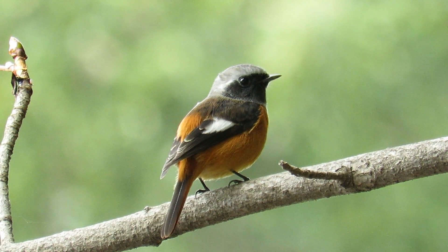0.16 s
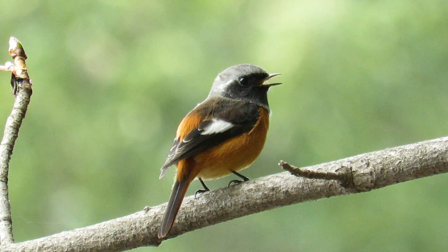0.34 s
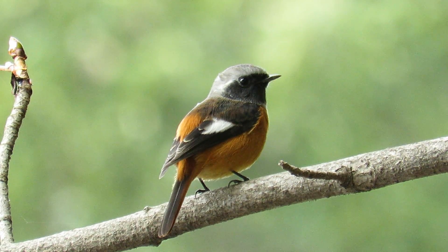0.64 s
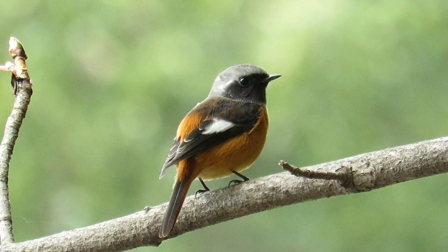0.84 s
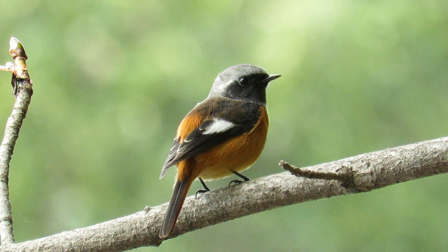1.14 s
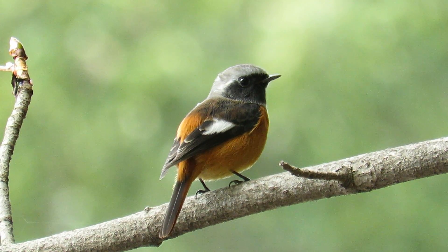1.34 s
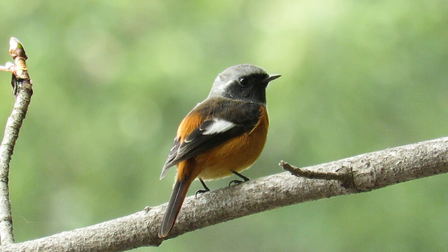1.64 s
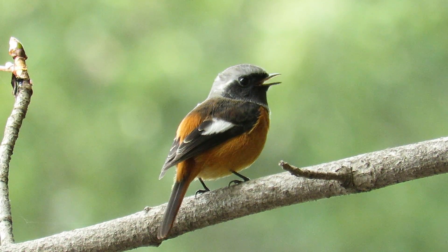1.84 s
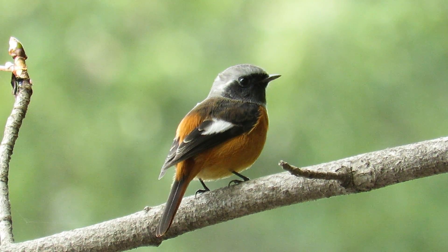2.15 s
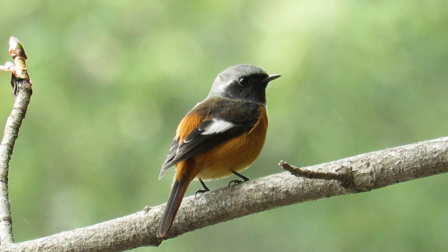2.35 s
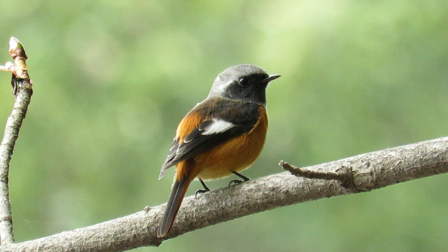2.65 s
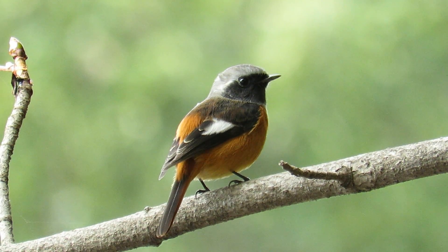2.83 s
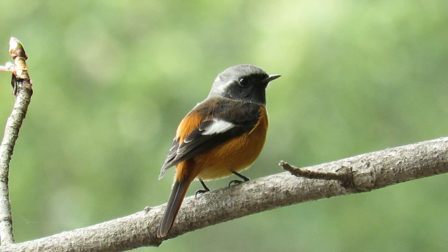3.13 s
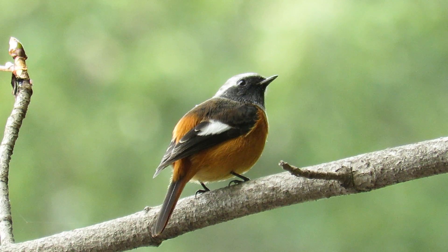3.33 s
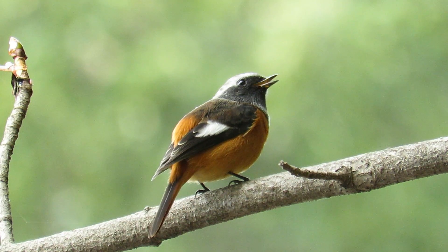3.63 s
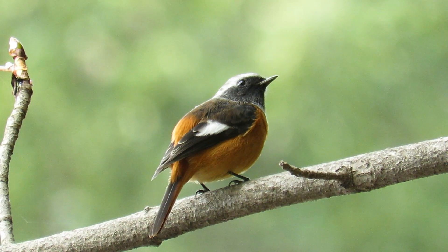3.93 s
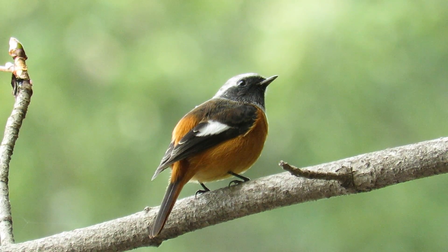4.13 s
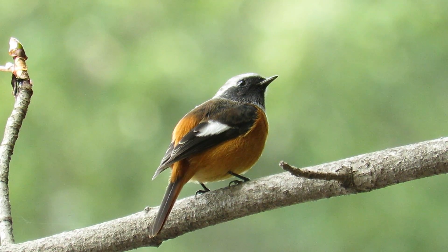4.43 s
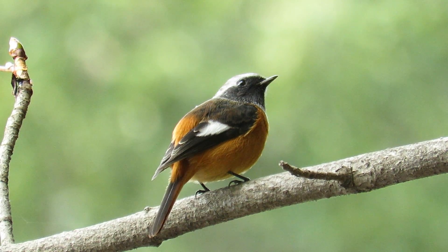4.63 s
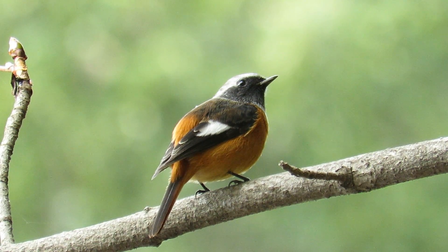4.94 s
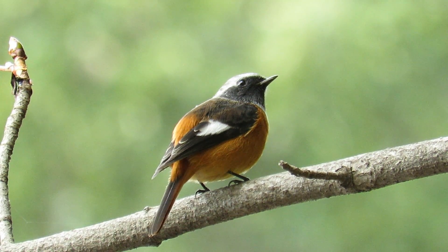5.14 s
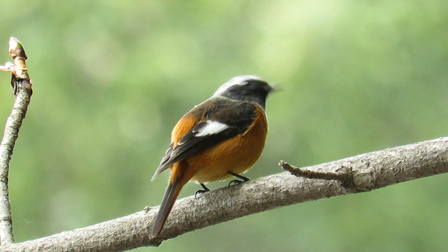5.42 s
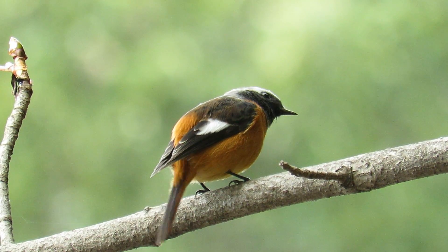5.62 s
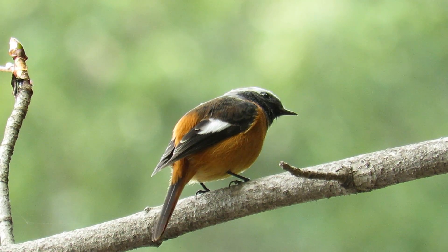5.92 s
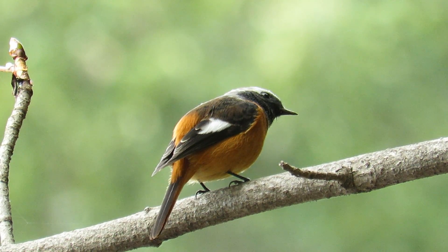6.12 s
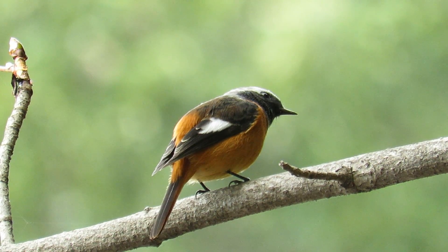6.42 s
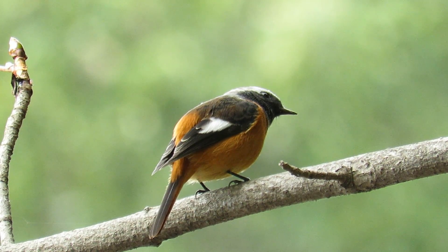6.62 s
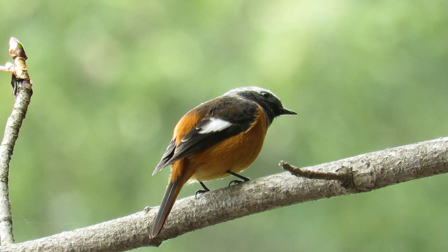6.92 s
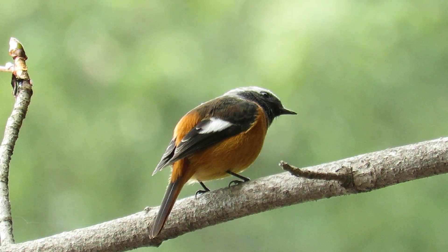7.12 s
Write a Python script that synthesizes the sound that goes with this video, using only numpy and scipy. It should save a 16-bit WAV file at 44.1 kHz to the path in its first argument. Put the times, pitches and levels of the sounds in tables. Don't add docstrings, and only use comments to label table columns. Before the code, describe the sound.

A small bird gives four thin, high single-note whistles spaced well apart, over soft hiss, faint cricket trills and distant chirps outdoors.

```python
import sys
import numpy as np
from scipy import signal
from scipy.fft import rfft, irfft, next_fast_len
from scipy.io import wavfile
from scipy.ndimage import uniform_filter1d, map_coordinates

SR = 44100
rng = np.random.default_rng(int(sys.argv[2]) if len(sys.argv) > 2 else 0)


def bounce(signal):
    frames = np.transpose(np.atleast_2d(signal))
    limited = np.clip(frames, -1, 1)
    pcm = np.round(limited * 32767).astype(np.int16)
    wavfile.write(sys.argv[1], SR, pcm)


def gain_from_db(level_db):
    decades = np.asarray(level_db, float) / 20
    return 10 ** decades


N = 320607
TIME = np.arange(N) / SR


def unit(x):
    return x / np.sqrt(np.mean(x ** 2) + 1e-20)


def wobble(rate_hz):
    knots = rng.standard_normal(int(N * rate_hz / SR) + 4)
    return map_coordinates(knots, [TIME * rate_hz])


def filtered(x, response):
    m = next_fast_len(N + SR // 2)
    return irfft(rfft(x, m) * response(np.fft.rfftfreq(m, 1 / SR)), m)[..., :N]


def coloured(spectrum):
    f, db = np.transpose(spectrum)
    shape = lambda hz: gain_from_db(np.interp(np.log(hz + 1), np.log(f + 1), db))
    return unit(filtered(rng.standard_normal(N), shape))


def window(start_s, length_s, edge_s):
    inside = np.minimum(TIME - start_s, start_s + length_s - TIME) / edge_s
    return np.sin(np.pi / 2 * np.clip(inside, 0, 1)) ** 2


def tone_of(hz):
    return np.sin(2 * np.pi * np.cumsum(hz) / SR)


def ports(x, pan_db, lead_rad):
    sign = np.array([[.5], [-.5]])
    return filtered(x, lambda hz: gain_from_db(pan_db * sign) * np.exp(1j * lead_rad * sign))


def foliage(x, t60_s, gap_s):
    t = np.arange(SR * 2 // 3) / SR
    own, shared = rng.standard_normal((2, len(t))), rng.standard_normal(len(t))
    tail = (own + 1.2 * shared) * gain_from_db(-60 * t / t60_s) * (1 - np.exp(-(t / gap_s) ** 2))
    return signal.oaconvolve(x[None], tail / np.linalg.norm(tail[0]), axes=1)[:, :N]


def distant(x, pan_db, lead_rad, wet_db, t60_s):
    return ports(x, pan_db, lead_rad) + gain_from_db(wet_db) * foliage(x, t60_s, gap_s=0.0018)


def floor():
    # (frequency [Hz], density [dB per Hz])
    shared_spectrum = [(12, -46), (20, -17), (65, -6.5), (95, -5), (190, -8), (249, -0.5), (300, -6),
                       (419, -8), (620, -10.5), (1000, -11.5), (1650, -15.5), (5000, -17.5), (13000, -21),
                       (16000, -22)]
    # (frequency [Hz], density [dB per Hz])
    opposed_spectrum = [(12, -63.5), (20, -35), (59, -26.5), (119, -7.5), (187, -11.5), (215, -3.5),
                        (254, 2), (308, -7.5), (355, -5), (554, -9), (1050, -15), (1560, -20), (3310, -25),
                        (16000, -30)]
    mid = gain_from_db(-50.5 + .4 * wobble(2)) * coloured(shared_spectrum)
    side = gain_from_db(-44.5 + .4 * wobble(2)) * coloured(opposed_spectrum)
    return np.array([mid + side, mid - side])


def chirps():
    # (time [s], length [s], start pitch [Hz], end pitch [Hz], level [dB])
    chirp_notes = [(0., .02, 2874, 2620, -54.5), (0.058, .04, 2320, 2180, -55),
                   (0.297, .05, 2300, 3300, -54.5), (0.382, .055, 2490, 2173, -56),
                   (0.626, .07, 1740, 1930, -61.5), (3.243, 0.0338, 2927, 2696, -61),
                   (3.323, 0.1, 2635, 2168, -58.5), (3.395, 0.08274, 2215, 1384, -62.5),
                   (4.231, 0.0284, 2950, 2766, -58), (4.303, 0.03803, 2200, 2450, -59.5),
                   (4.383, .03, 2422, 2305, -61.5), (4.952, 0.0396, 2400, 2300, -60),
                   (5.505, 0.05193, 1760, 1810, -62), (0.816, 0.1221, 285, 296, -53)]
    voice, burr = np.zeros(N), wobble(120)
    for s, length_s, start_hz, end_hz, db in chirp_notes:
        slur_hz = np.interp(TIME, [s, s + length_s], [start_hz, end_hz])
        voice += gain_from_db(db) * window(s, length_s, length_s / 3) * tone_of(slur_hz * (1 + .025 * burr))
    return distant(voice, pan_db=.7, lead_rad=1.2, wet_db=2, t60_s=.2)


def trill():
    # (time [s], length [s], pitch [Hz], level [dB])
    bouts = [
        (0.061, 1.21, 4045, -55),
        (1.445, 0.18, 4080, -59),
        (2.043, 0.44, 3940, -63.5),
        (2.874, .25, 4050, -58),
        (3.32, 0.24, 4046, -53),
        (3.52, .82, 4035, -54.5),
        (4.5, .45, 3928, -61.5),
        (5.1, 0.58, 4020, -63),
        (5.86, .16, 4080, -57.5),
    ]
    peak_shares = [.45, .2, 0.46, 1, .3, .2, 0.58, .8, 0.18]
    # (frequency [Hz], density [dB per Hz])
    chorus_spectrum = [(2000, -41), (2600, -26), (3500, -8.5), (3800, -7), (4000, -5.5), (4200, -2),
                       (4400, -38.5)]
    rise_db, fall_db, hz_per_db = 6.5, 8, 9
    voice, haze = np.zeros(N), np.zeros(N)
    for (s, length_s, top_hz, top_db), share in zip(bouts, peak_shares):
        peak_s = s + np.clip(share, .05, .95) * length_s
        under_db = np.interp(TIME, [s, peak_s, s + length_s], [-rise_db, 0, -fall_db])
        effort = gain_from_db(top_db + under_db) * window(s, length_s, 0.025)
        stroke = np.cumsum(63 + 5 * wobble(8)) / SR % 1
        hz = top_hz + hz_per_db * under_db + 130 * (.5 - stroke)
        hz = hz + 45 * wobble(45) + 55 * wobble(14)
        pulse = .1 + .9 * np.sin(np.pi * stroke) ** 2
        voice += effort * gain_from_db(4.0 + 2.6 * wobble(30)) * pulse * tone_of(hz)
        haze += effort
    haze = uniform_filter1d(haze, size=SR // 6) * gain_from_db(-2.5)
    far = haze * np.array([coloured(chorus_spectrum), coloured(chorus_spectrum)])
    return distant(voice, pan_db=-6.5, lead_rad=0.97, wet_db=-3, t60_s=0.57) + far


def whistler():
    # (time [s], length [s], low pitch [Hz], level [dB], climb [Hz/s])
    whistles = [
        (.5445, .125, 4812, -23.5, 696),
        (2.0744, .1254, 4834, -21, 577),
        (3.7822, .1357, 4852, -29.5, 11),
        (5.4709, .1277, 4819, -28.5, 200),
    ]
    # (left minus right [dB], foliage [dB], near trunks [dB], far trunks [dB],
    # flutter [dB])
    headings = [(6.5, -19.5, -12, -22, 1.2), (4.5, -18.5, -12, -25, .4), (3.5, -16.5, -18, -18, 6),
                (2, -16.5, -12.5, -18, 4)]
    # (near path change [s], far path change [s])
    perches = [(-.005256, -.008063), (.00159, -.005278), (-.001104, -.006569), (-.002547, .009834)]
    # (delay [s], left level [dB], right level [dB])
    trunks = [(.013, 5.5, -5.5), (.027008, 1, -2), (.074003, 3, 3.5), (.125, -4, -3.5), (.18, -6, -8)]
    onset_hz, onset_s, sharp_hz, settle_s = 260, .011, 213, .0261
    drop_hz, drop_s, plunge_hz = 70, .0407, 220
    soft_db, attack_s, swell_db_per_s = 61, .0211, -10
    close_db, release_s = 31.5, .0097
    flutter_hz, last_beat_s = 68, .008
    lead_rad = np.array([[1.], [-.9]])
    out, t = np.zeros((2, N)), np.arange(SR) / SR
    f = np.fft.rfftfreq(SR, 1 / SR)
    for whistle, heading, (near_s, far_s) in zip(whistles, headings, perches):
        s, length_s, low_hz, top_db, climb = whistle
        pan_db, foliage_db, near_db, far_db, flutter_db = heading
        span = slice(round(s * SR), round(s * SR) + SR)
        droop = np.clip(1 - (length_s - t) / drop_s, 0, 1) ** 2
        closing = np.clip(1 - (length_s - t) / release_s, 0, 1) ** 2

        hz = low_hz + climb * t - drop_hz * droop - plunge_hz * closing
        hz = hz + sharp_hz * np.exp(-t / settle_s) + onset_hz * np.exp(-t / onset_s)
        db = top_db - soft_db * np.exp(-t / attack_s) - swell_db_per_s * (length_s - t)
        gain = gain_from_db(db - close_db * closing) * (t < length_s)

        turn = 2 * np.pi * np.cumsum(hz) / SR
        tone = gain * np.sin(turn + lead_rad)
        overtone_db = -34.5 + 5 * (foliage_db + 19)
        octave = gain * gain_from_db(overtone_db) * np.sin(2 * turn + 2 * lead_rad)
        beat = np.cos(2 * np.pi * flutter_hz * (length_s - last_beat_s - t))
        flutter = gain_from_db(flutter_db * np.minimum(t / length_s, 1) ** 2 * beat)

        echoes = 0
        for delay_s, left_db, right_db in trunks:
            echo_db, shift_s = (near_db, near_s) if delay_s < .05 else (far_db, far_s)
            echo_gain = gain_from_db(echo_db + np.array([[left_db], [right_db]]))
            echoes = echoes + echo_gain * np.exp(-2j * np.pi * f * (delay_s + shift_s))
        below_hz = np.maximum(low_hz + climb * length_s - 20 - f, 0)
        beak = 1 / (1 + (below_hz / 90) ** 2)

        out[:, span] += (tone * flutter + octave) * gain_from_db([[0], [-pan_db]])
        out[:, span] += irfft(rfft(tone) * echoes * beak, SR)
        out[:, span] += gain_from_db(foliage_db) * foliage(tone[0], t60_s=.65, gap_s=.08)[:, :SR]
    return out


def answers():
    # (time [s], length [s], pitch [Hz], level [dB])
    bursts = [
        (1.326, 0.21, 4570, -49.5),
        (3.165, .175, 4520, -47.5),
        (4.771, 0.1373, 4549, -49),
        (6.18, 0.13, 4600, -55),
    ]
    voice = np.zeros(N)
    for s, length_s, mid_hz, db in bursts:
        stroke = (TIME - s) * 63.5 % 1
        hz = mid_hz + 500 * (.5 - stroke) + 40 * wobble(40)
        pulse = np.sin(np.pi * stroke) ** 4 * window(s, length_s, 0.0043)
        voice += gain_from_db(db + 0.73 * wobble(50)) * pulse * tone_of(hz)
    return distant(voice, pan_db=4, lead_rad=1.6, wet_db=-8, t60_s=.15)


def lens():
    # (frequency [Hz], width [Hz], level [dB])
    housing = [(83.23, 30, -1.5), (115.5, 80, -2), (242, 90, -1), (420, 90, -13.5)]
    # (time [s], length [s], level [dB])
    whirrs = [
        (3.968, .42, -50.5),
        (5.385, 0.25, -55),
    ]
    kick = np.zeros(N)
    for s, db in zip(3.98 + np.arange(12) / 30, rng.normal(0, 1.659, 12)):
        kick += gain_from_db(db) * (TIME > s) * gain_from_db(-60 * np.abs(TIME - s) / 0.032)
    puff = unit(uniform_filter1d(rng.standard_normal((2, N)), 30))
    push = kick * (1 + 0.67 * puff)

    def body(f):
        total = 0
        for k, (centre_hz, width_hz, db) in enumerate(housing):
            loss = 1j * f * width_hz
            total = total + (-1) ** k * gain_from_db(db) * loss / (centre_hz ** 2 - f * f + loss)
        return total * np.exp(1j * np.array([[1.2], [-1.]]))

    rattle = gain_from_db(-58.5) * unit(filtered(push, body))
    speed_hz = np.interp(TIME, [3.97, 4.2, 4.4, 5.6], [239.7, 432.0, 390.8, 415.18]) + 60 * wobble(60)
    turning = sum(gain_from_db(db) * window(s, length_s, 0.0082) for s, length_s, db in whirrs)
    whirr = turning * gain_from_db(1.5 + 1.9 * wobble(40)) * tone_of(speed_hz)
    gear_noise = coloured([(40, -32.5), (90, 0.5), (180, -7.0), (250, 4.5), (300, -16), (450, -38.0)])
    gears = turning * gain_from_db(1.5) * gear_noise
    return rattle + ports(whirr, 2.3, 2.3) + ports(gears, -2, 2.13)


def scene():
    return floor() + chirps() + trill() + whistler() + answers() + lens()


def top_cut(x):
    return signal.sosfilt(signal.butter(12, 16850, fs=SR, output="sos"), x)


def record(dry):
    fade_from_s, fade_to_s = 5.83, 6.9
    cut_s, residue_db, residue_s = 6.594, -48, .016
    dither = gain_from_db(-92.5) * rng.standard_normal((2, N))
    fade = np.clip((fade_to_s - TIME) / (fade_to_s - fade_from_s), 0, 1)
    cut = np.where(TIME < cut_s, 1, gain_from_db(residue_db) * (TIME < cut_s + residue_s))
    mix = filtered(dry * fade * cut + dither, lambda hz: hz < 15780)
    return top_cut(mix)


dry = scene()
out = record(dry)
bounce(out)
```